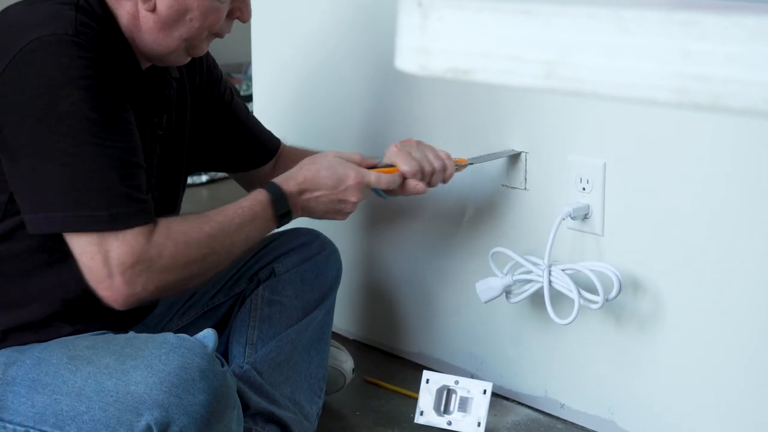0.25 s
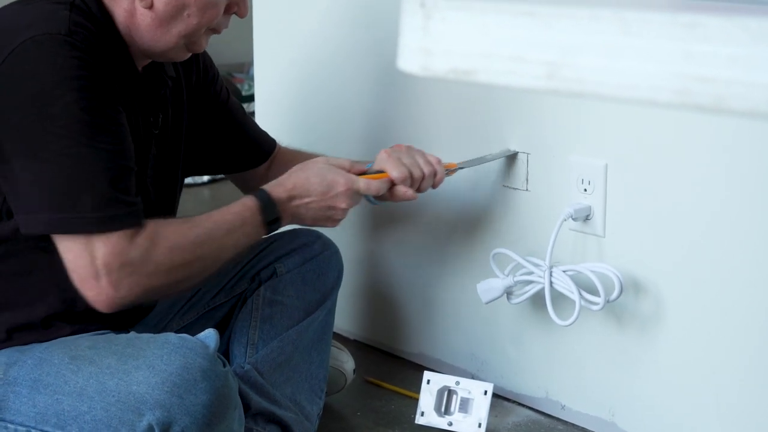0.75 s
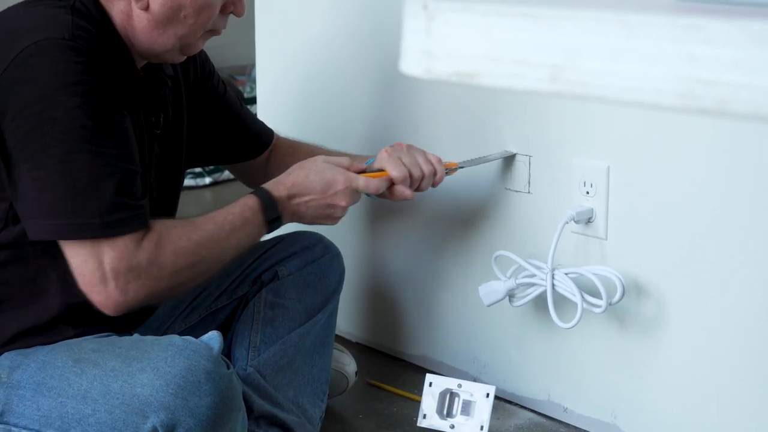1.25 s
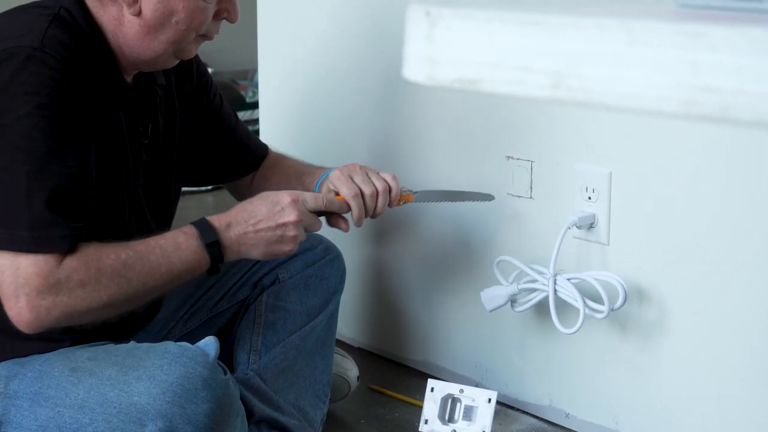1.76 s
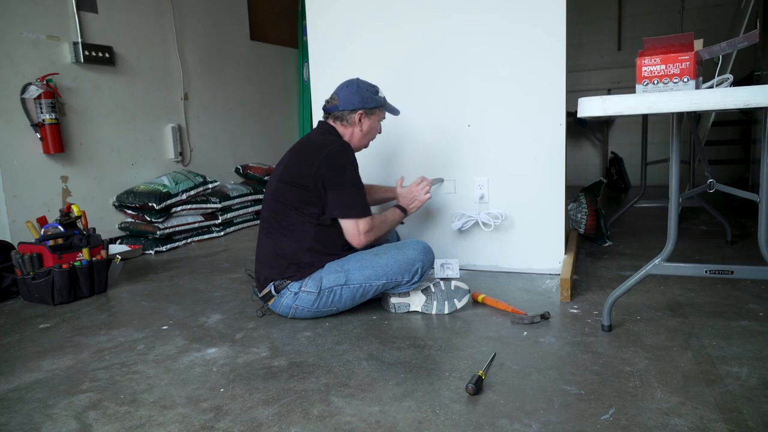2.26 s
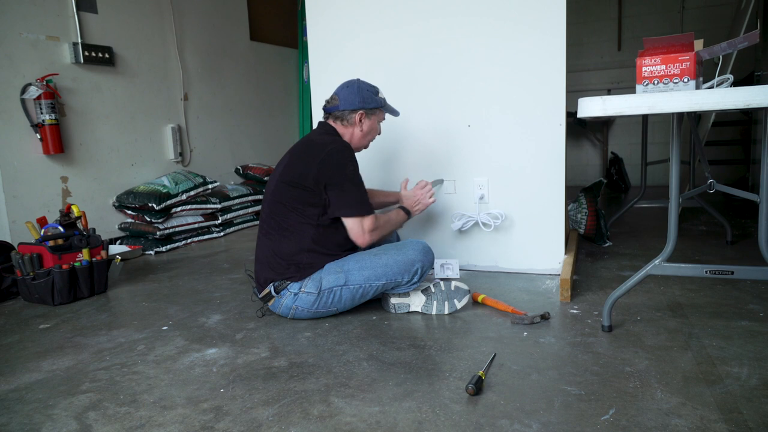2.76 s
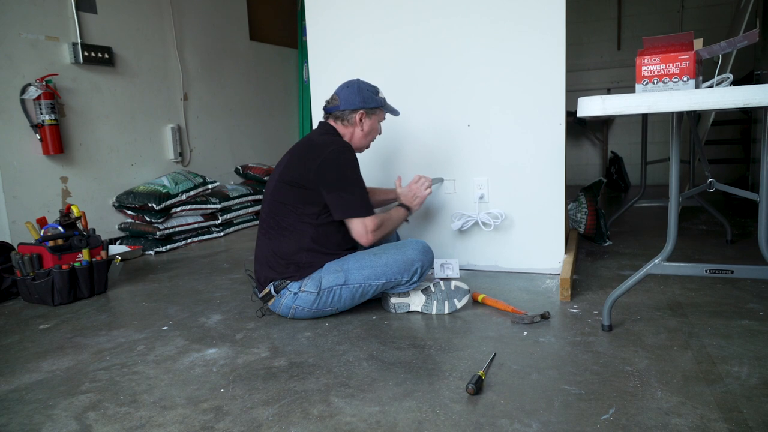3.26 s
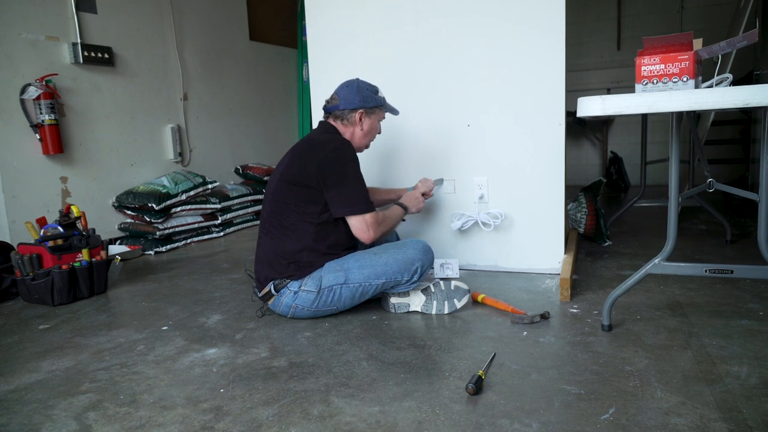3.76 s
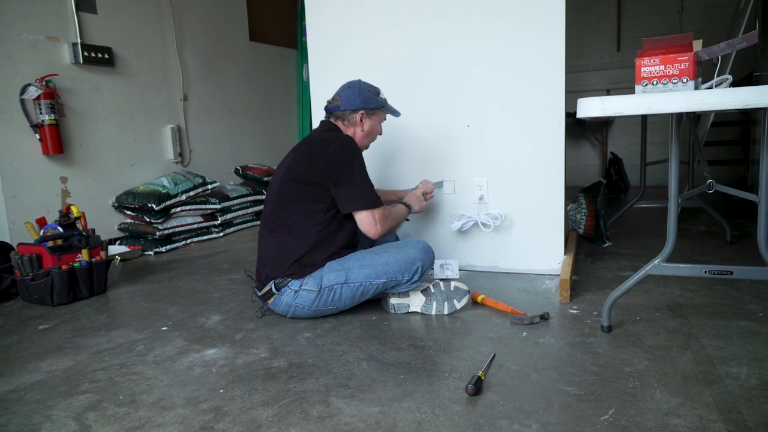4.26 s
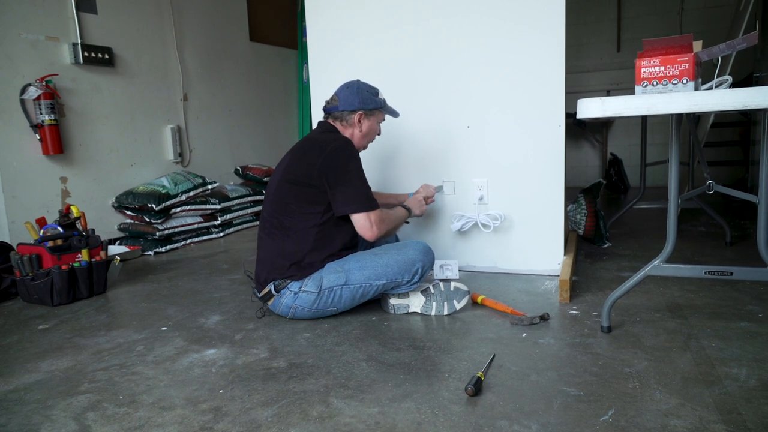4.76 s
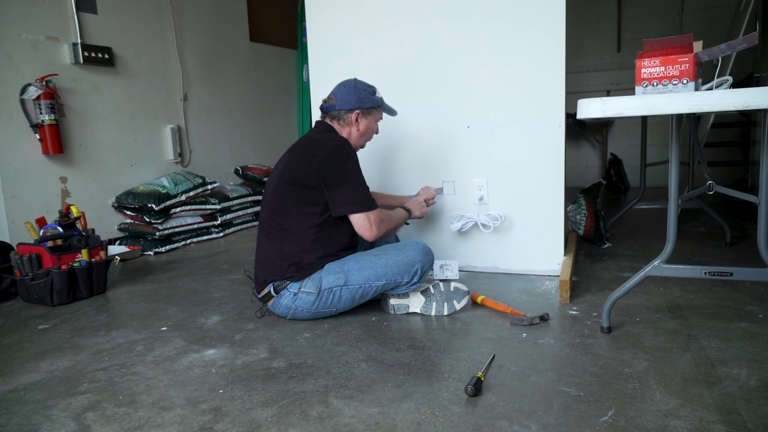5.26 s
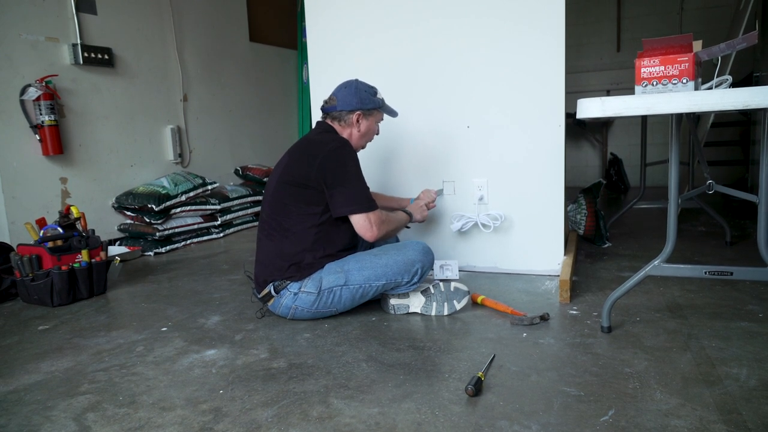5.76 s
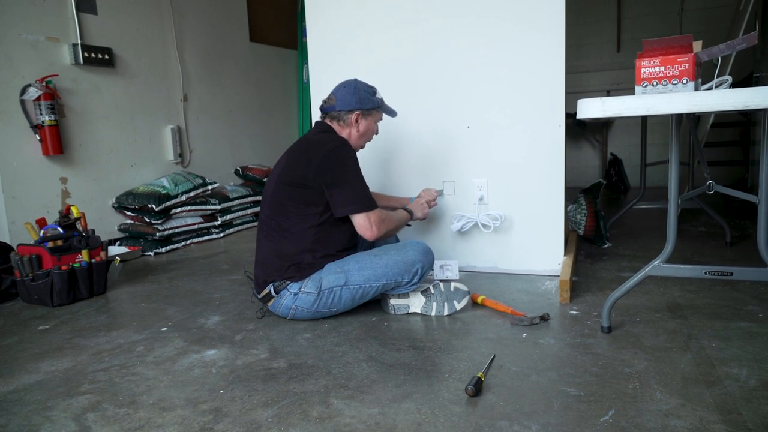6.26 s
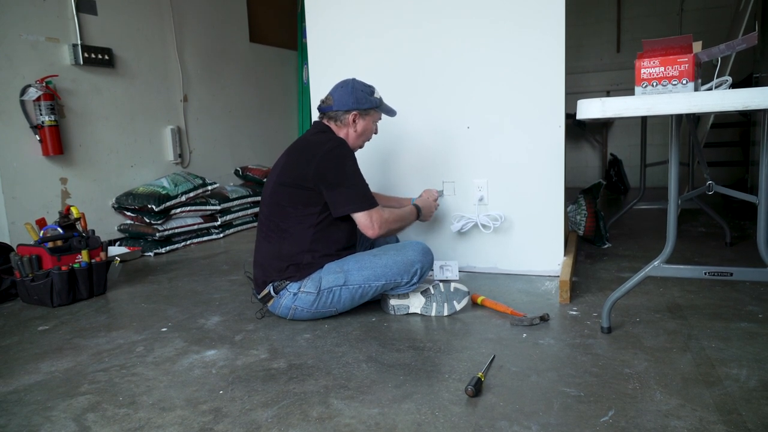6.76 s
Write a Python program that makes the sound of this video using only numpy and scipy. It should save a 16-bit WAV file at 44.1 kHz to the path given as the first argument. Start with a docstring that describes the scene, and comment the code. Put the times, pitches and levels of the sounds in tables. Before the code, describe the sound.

In a bare concrete garage, close to the wall, a short burst of rapid drywall sawing rasps and thuds. Then the blade is punched through by seven heavy, hollow blows, the second weaker, with crushing gypsum and little dry ticks between. A second run of back-and-forth sawing follows, fading into lighter, irregular strokes over a steady quiet rumble of room air.

```python
"""Short quick strokes rasp and thump: a jab saw cuts a plasterboard wall in a bare concrete garage.
Catching teeth excite the modes of hollow wall and board; gypsum grit rasps as noise through the blade's modes.
Between two cuts, palm blows on the handle punch the blade through with a boom and a crunch of gypsum.
Falling crumbs tick as short resonant noise bursts; a diffuse tail and a steady room tone surround it all."""
import sys
import numpy as np
from scipy import signal
from scipy.fft import rfft, irfft
from scipy.io import wavfile

SR = 44100
rng = np.random.default_rng(int(sys.argv[2]) if len(sys.argv) > 2 else 0)


def store_wav(level_fs):
    """Save 16-bit WAV to argv[1]."""
    pcm = np.round(np.clip(np.atleast_2d(level_fs), -1, 1) * 32767)
    wavfile.write(sys.argv[1], SR, pcm.T.astype(np.int16))


N = 308259   # samples

# Modal tables: f/Hz, bandwidth/Hz, then relative level/dB at each of the four working spots
# hollow wall between its studs
CAVITY_MODES = [(35.7, 18.7, -12.5, -12, -19, -7.5), (71.7, 23.9, 2.5, -2.5, -0.5, 1.5),
                (112.2, 33.5, 2, -1, 0, -1.5), (153.4, 29.8, 0, 2.5, -1, 1),
                (212, 47.9, -8.5, -5.5, -8, -7.5)]
# bending of the board
BOARD_MODES = [(275, 119, -4, -2.5, -3.5, -3), (353, 52, 4.5, 8, 6.5, 2.5), (415, 53.7, 2.5, 0, 2, 0.5),
               (493, 66, 0, -4.5, -1.5, -2), (574.4, 63.4, -4.5, -6, -3.5, -3),
               (670, 62, -5, -3.5, -5, -3.5), (764, 58, -11, -5, -10, -7),
               (885, 97, -12.5, -8.5, -12, -13.5), (1052, 94, -13.5, -9, -13, -15.5),
               (1129, 122, -19, -11.5, -13.5, -15), (1366, 456, -29.5, -18.5, -21.5, -22)]
# cut edge of the board
EDGE_MODES = [(1210, 196, 0, -6.5, -2, 1), (1685, 128, 3.5, 2, 5.5, -3), (1800, 440, -1.5, 0, 1.5, -2),
              (2310, 470, -4.5, 0, 1, -1), (2732, 88, 0.5, 4, 5.5, 2), (2870, 285, -7.5, -3, -6.5, -4.5)]
# steel blade
BLADE_MODES = [(3346, 390, -7.5, -2, -1.5, -5.5), (4040, 970, -11, -9, -7.5, -9.5),
               (4900, 930, -10.5, -10, -5.5, -10), (6050, 470, -15, -12, -13, -15),
               (6630, 230, -13.5, -30, -12, -15)]
# grit on the thin steel
GRIT_MODES = [(7900, 6100, -6, -4.5, -7.5, -4.5), (10040, 1200, 3, 4, 3, 2), (12900, 2700, 1.5, 2.5, 1, 3),
              (16800, 1200, 4, 4.5, 1, 0)]
# moves of the blade from first cut to punched hole, start of second cut and rest of it: t/s
MOVES_S = [1.8, 3.85, 4.98]


def sawing():
    """Stick-slip excitation: each tooth catches and lets go, driving modes and puffs of grit; hard thumps join in."""
    per_s, boom, knock, rasp, scrape, fine = stroke_curves()
    hard_boom, hard_knock, hard_scrape, hard_fine = hard_thumps()
    spot = np.searchsorted(MOVES_S, np.arange(N) / SR)

    wander = amp(2.1 * drift(per_s=70))   # teeth bind and slip unevenly
    passed = np.cumsum((per_s + 30) * wander / SR)
    catches = np.diff(np.floor(passed), prepend=0)
    teeth = rms_one(catches * amp(rng.uniform(-6.5, 4.0, N)))

    pulse = soften(teeth, hz=110) / (soften(teeth, hz=52.3) + 1e-4)   # evens out the tooth rate
    clumps = amp(2.1 * drift(per_s=70) + 2.0 * drift(per_s=45))   # gypsum breaks in clumps
    puffs = (0.42 + 0.23 * pulse) * clumps
    rumble = grains(1500, spread_db=2.5)
    grit = grains(7000, spread_db=3.0)

    wall_force = boom * (0.63 * teeth + 0.43 * rumble) + hard_boom
    board_force = knock * (0.54 * teeth + 0.7 * rumble) + hard_knock
    edge_force = (rasp * puffs + hard_scrape) * grit
    blade_force = (scrape * puffs + 0.72 * hard_scrape) * grit
    fine_force = (fine * puffs + hard_fine) * rng.standard_normal(N)

    out = resonate(wall_force, CAVITY_MODES, spot)
    out += resonate(board_force, BOARD_MODES, spot, shift_db=2.5)
    out += resonate(edge_force, EDGE_MODES, spot, shift_db=1.5)
    out += resonate(blade_force, BLADE_MODES, spot, shift_db=2.0)
    return out + resonate(fine_force, GRIT_MODES, spot, shift_db=2.0)


# nominal teeth in one stroke and their spread between strokes; cap on the rate before wander
TEETH_PER_STROKE, TEETH_SPREAD_DB, TEETH_CAP_PER_S = 9.5, 2, 190
RAMP_S, BITE_LAG = .012, 0.026   # margin at both ends; the bite peaks this share of a stroke after the speed
# the board's knock follows a weighted mean of bite and rasp: share of rasp, offset
KNOCK_FROM_RASP, KNOCK_DB = 0.38, -1
# the blade's scrape follows a weighted mean of rasp and fine grit: share of grit, offset
SCRAPE_FROM_GRIT, SCRAPE_DB = 0.52, -2.5
# saw strokes: start t/s, length/s, moment of top speed (share of stroke),
# relative levels of bite/dB, rasp/dB, fine grit/dB
STROKES = [(0.017, 0.11, 0.6, -27, -49, -61), (0.148, 0.074, 0.67, -16.5, -42.5, -49.5),
           (0.221, 0.04, 0.27, -24, -44, -51), (0.317, 0.099, 0.36, -24.5, -49, -58),
           (0.424, 0.048, 0.43, -34.5, -62, -64.5), (0.481, 0.024, 0.55, -30, -57, -62),
           (0.542, 0.15, 0.49, -33, -56.5, -63), (0.696, 0.093, 0.41, -21, -41.5, -46.5),
           (0.815, 0.12, 0.58, -26.5, -50, -55), (0.958, 0.12, 0.52, -27.5, -48, -56),
           (1.098, 0.094, 0.53, -29.5, -52.5, -57.5), (1.233, 0.092, 0.46, -23.5, -45.5, -53),
           (1.327, 0.11, 0.63, -31, -57.5, -58), (1.451, 0.093, 0.42, -28, -49, -51.5),
           (1.567, 0.067, 0.44, -35, -84, -60.5), (3.898, 0.087, 0.48, -37, -52.5, -57),
           (4.054, 0.12, 0.62, -26, -43, -50.5), (4.17, 0.058, 0.5, -33, -50, -62),
           (4.24, 0.074, 0.33, -32.5, -50, -55.5), (4.329, 0.1, 0.55, -22.5, -46.5, -52),
           (4.47, 0.099, 0.5, -19.5, -42, -52.5), (4.616, 0.082, 0.56, -24, -54.5, -54),
           (4.747, 0.1, 0.48, -27, -49, -53.5), (4.868, 0.096, 0.5, -31, -54, -56),
           (5, 0.11, 0.65, -26, -48, -51), (5.154, 0.1, 0.41, -31, -55.5, -54.5),
           (5.277, 0.065, 0.51, -33.5, -62, -62), (5.384, 0.11, 0.53, -34, -58, -60),
           (5.512, 0.069, 0.61, -31.5, -53, -57), (5.586, 0.02, 0.41, -34, -64, -63),
           (5.643, 0.072, 0.53, -37, -59.5, -62), (5.755, 0.097, 0.55, -34, -55.5, -57.5),
           (5.876, 0.079, 0.59, -37, -59.5, -58.5), (5.979, 0.08, 0.48, -33.5, -53, -55.5),
           (6.098, 0.074, 0.54, -47, -60.5, -63), (6.193, 0.052, 0.6, -37.5, -56, -59),
           (6.315, 0.07, 0.58, -45, -59, -60.5), (6.412, 0.047, 0.7, -36, -56.5, -56),
           (6.645, 0.16, 0.44, -58.5, -69.5, -71), (6.827, 0.059, 0.8, -44.5, -67, -64),
           (6.899, 0.074, 0.54, -39, -58, -57)]


def stroke_curves():
    """Force and speed control: wall and board follow the bite, while tooth rate and rasping follow the speed."""
    curves = np.zeros((6, N))
    chances = rng.standard_normal(len(STROKES))
    for (s, length, top, bite_db, rasp_db, grit_db), chance in zip(STROKES, chances):
        first = max(round((s - RAMP_S) * SR), 0)
        last = min(round((s + length + RAMP_S) * SR), N)
        at = np.arange(first, last)
        speed, bite = swell(at, top), swell(at, top + BITE_LAG)
        per_s = min(TEETH_PER_STROKE / length * amp(TEETH_SPREAD_DB * chance), TEETH_CAP_PER_S)
        knock_db = between(bite_db, rasp_db, KNOCK_FROM_RASP, KNOCK_DB)
        scrape_db = between(rasp_db, grit_db, SCRAPE_FROM_GRIT, SCRAPE_DB)
        tops = np.r_[per_s, amp([bite_db, knock_db, rasp_db, scrape_db, grit_db])]
        shapes = [speed ** .3, bite ** 1.2, bite ** 0.81, speed ** 1.24, speed ** 1.28, speed ** 1.02]
        curves[:, at] = np.maximum(curves[:, at], tops[:, None] * shapes)
    return curves


SPRAY_RISE_S, SPRAY_S = 0.0034, 0.0039   # time constants of the gypsum spray
# share of the knock's swing that the spray follows; offsets of coarse and fine spray
SPRAY_FOLLOWS, SPRAY_DB, FINE_SPRAY_DB = 0.41, -40.5, -43
# hardest short thumps: saw teeth snagging and, at 1.96 and 2.269 s, rebounds of palm blows:
# t/s, relative level/dB of the thump in the wall, relative level/dB of the knock in the board
HARD_THUMPS = [(0.047, -25, -39), (0.063, -1.5, -13), (0.168, -1, -9), (0.201, -6, -6), (0.228, -4, -0.5),
               (0.236, 0, -10), (0.347, 0, -28), (0.489, -1.5, -14.5), (0.702, 4.5, -29), (0.994, -12, -13),
               (1.126, 0, -17), (1.24, 5.5, -21), (1.373, 0, -31), (1.96, 2.5, -20), (2.269, 1.5, -13),
               (4.102, 4.5, -24), (4.207, 3, -11), (4.248, 1, -13), (4.3, -1, -14), (4.348, 7.5, -25),
               (4.384, 1, -14), (4.477, 3.5, -7), (4.519, 1, -14), (4.557, -12, -18), (4.631, 7.5, -31),
               (4.683, -23, -10.5), (4.765, -3, -10), (4.807, 5.5, -11), (4.91, 2.5, -33),
               (5.026, 0.5, -25), (5.163, -0.5, -33), (5.29, -5, -30), (5.316, -8, -24), (5.44, -4, -16.5),
               (5.542, 0, -23), (5.59, -6, -17), (5.677, -15, -19), (5.776, -9, -22), (5.794, -1, -29),
               (5.914, -2.5, -20), (6.01, 0.3, -12), (6.21, -7, -29), (6.445, 2, -24), (6.862, -20, -19.5),
               (6.877, -2, -20), (6.913, -2, -15.5)]


def hard_thumps():
    """Impulsive excitation: each snag or rebound thumps wall and board once and sends out a short spray of gypsum."""
    s, thump_db, knock_db = np.transpose(HARD_THUMPS)
    chance_db = 3.1 * rng.standard_normal((len(s), 2)).T
    spray_db = SPRAY_FOLLOWS * knock_db + chance_db + [[SPRAY_DB], [FINE_SPRAY_DB]]
    hits = np.zeros((4, N))
    hits[:, np.round(s * SR).astype(int)] = amp([thump_db, knock_db, *spray_db])
    boom, knock, scrape, fine = hits
    after = np.arange(SR // 20) / SR
    spray = (1 - np.exp(-after / SPRAY_RISE_S)) * np.exp(-after / SPRAY_S)
    sprays = signal.fftconvolve([scrape, fine], [spray], axes=1)[:, :N]
    return boom, knock, *np.abs(sprays)


PUNCH_HZ = 477.5
# the shudder follows a weighted mean of boom and punch, 9 dB lower
SHUDDER_FROM_PUNCH, SHUDDER_DB = 0.32, -9
# the crack follows a weighted mean of boom and crumble, 20.5 dB lower
CRACK_FROM_CRUMBLE, CRACK_DB = 0.31, -20.5
# palm blows on the handle: t/s, relative levels of boom/dB, punch/dB, crumble/dB,
# time for the crushing to fall to about half/s
BLOWS = [(1.931, -15, -27, -57.5, 0.023), (2.252, -24.5, -39.5, -65, 0.073),
         (2.491, -13.5, -14.5, -57, 0.028), (2.755, -15, -17, -61, 0.038), (3.03, -12.5, -13.5, -57, 0.028),
         (3.33, -7.5, -13.5, -45, 0.032), (3.636, -11.5, -27, -46.5, 0.028)]


def blows():
    """Impact and fracture: a blunt punch sets wall and board ringing while the tip shudders and crushes gypsum."""
    out = np.zeros(N)
    after = np.arange(SR // 4) / SR
    shudder = grains(900, spread_db=2.5)
    jerks = amp(2.5 * drift(per_s=50))   # the tip breaks through in jerks
    breaking = grains(9000, spread_db=2.5) * amp(2.5 * drift(per_s=120))
    contact = np.exp(-((after - .0056) / .0014) ** 2)
    for s, boom_db, punch_db, crumble_db, length in BLOWS:
        shudder_db = between(boom_db, punch_db, SHUDDER_FROM_PUNCH, SHUDDER_DB)
        crack_db = between(boom_db, crumble_db, CRACK_FROM_CRUMBLE, CRACK_DB)
        start = round(s * SR)
        span = slice(start, start + len(after))
        crush = np.minimum(after / 0.0047, 1) / (1 + (after / length) ** 1.99) * jerks[span]
        shaking = crush * shudder[span]

        # single-sample impulses strike the wall at once and the board 200 samples later
        wall_force = amp(boom_db + 18) * (after == 0) + amp(boom_db - 8.5) * shaking
        board_force = amp(punch_db + 17.5) * (after == after[200]) + amp(shudder_db) * shaking
        crack_force = amp(crack_db) * (crush + 0.33 * contact) * breaking[span]
        crumble_force = amp(crumble_db) * crush * breaking[span]

        out[span] += amp(punch_db + 8.5) * contact * np.sin(2 * np.pi * PUNCH_HZ * after)
        out[span] += resonate(wall_force, CAVITY_MODES, spot=1)
        out[span] += resonate(board_force, BOARD_MODES, spot=1)
        out[span] += resonate(crack_force, EDGE_MODES + BLADE_MODES, spot=1)
        out[span] += resonate(crumble_force, GRIT_MODES, spot=1)
    return out


TICK_LOW_HZ, TICK_HIGH_HZ, TICK_TREBLE_DB = 4400, 5650, -15
# after each blow a few more crumbs fall, thinning out: mean wait, mean level, spread of level
CRUMBS_FALL_S, CRUMB_DB, CRUMB_SPREAD_DB = 0.043, -62.5, 5
# clearest crumbs and blade ticks: t/s, relative level/dB
TICKS = [(1.7895, -69), (1.8491, -65), (1.9265, -53), (1.935, -47), (2.2812, -41), (2.3054, -51),
         (2.4194, -54), (2.6005, -59), (2.658, -54), (2.871, -51.5), (2.923, -50), (3.0604, -44),
         (3.1978, -52.5), (3.3284, -59), (3.4955, -49.5), (3.6038, -66), (6.5574, -72)]


def ticks():
    """Small impacts: short bursts of noise ring around one pitch, with a bright edge from the grit modes."""
    out = np.zeros(N)
    after = np.arange(400) / SR
    wait = rng.exponential(1, (len(BLOWS), 4))
    size = rng.standard_normal((len(BLOWS), 4))
    crumb_s = np.array(BLOWS)[:, :1] + CRUMBS_FALL_S * wait
    crumb_db = CRUMB_DB + CRUMB_SPREAD_DB * size
    rows = np.r_[np.c_[crumb_s.ravel(), crumb_db.ravel()], TICKS]
    noises = rng.standard_normal((len(rows), len(after)))
    pitches = TICK_LOW_HZ + rng.random(len(rows)) * (TICK_HIGH_HZ - TICK_LOW_HZ)
    for (s, level_db), noise, hz in zip(rows, noises, pitches):
        at = round(s * SR)
        span = slice(at, at + len(after))
        burst = noise * np.exp(-after / 0.003) * np.minimum(after / 0.0011, 1)
        out[span] += amp(level_db) * resonate(burst, [(hz, 1500, 0)])
        out[span] += amp(level_db + TICK_TREBLE_DB) * resonate(burst, GRIT_MODES, spot=1)
    return out


# reverberation time of the garage: f/Hz, T60/s
GARAGE_T60 = [(60, 0.83), (160, 0.61), (420, 0.43), (1100, 0.47), (2900, 0.59), (7700, 0.42), (14000, 0.12)]
# strength of the diffuse tail: f/Hz, relative level/dB
GARAGE_WET = [(60, -6.5), (250, -6.5), (1000, -2), (4000, -2), (12000, -8.5)]


def garage(x):
    """Diffuse reverberation: half-octave bands of noise decay exponentially at their own T60, after a short gap."""
    after = np.arange(SR) / SR
    hz = np.arange(SR // 2 + 1)
    noise = rfft(rng.standard_normal(SR))
    tail = 0
    for centre in 30 * 2 ** np.arange(0, 9.5, .5):
        octaves = np.clip(np.log2(hz / centre + 1e-9), -.5, .5)
        band = irfft(noise * np.cos(np.pi * octaves) ** 2, SR)
        t60 = at_hz(GARAGE_T60, centre)
        decay = amp(at_hz(GARAGE_WET, centre) - 60 * after / t60)
        even_energy = np.sqrt(2 * np.log(1000) / t60 / SR)   # offsets the greater energy of long decays
        tail = tail + band * decay * even_energy
    onset = np.clip((after - .006) / 0.021, 0, 1)
    return signal.fftconvolve(x, tail * onset)[:N]


AIR_DB = -53.5   # rms level of the room tone
# spectrum of the room tone: f/Hz, relative spectral level/dB
AIR = [(25, -6.5), (64, 1), (200, -12.5), (400, -13.5), (1860, -35), (5000, -44.5), (9000, -49.5),
       (16000, -53)]


def air():
    """Stationary noise: white noise shaped by a fixed spectrum gives a steady room tone."""
    hz = np.arange(N // 2 + 1) * SR / N
    spectrum = rfft(rng.standard_normal(N)) * amp(at_hz(AIR, hz))
    return amp(AIR_DB) * rms_one(irfft(spectrum, N))


def resonate(x, modes, spot=0, shift_db=0):
    """Modal superposition: parallel resonances of alternating sign, scaled so that white noise keeps its rms.
    With shift_db the share of each mode drifts, as the blade slides."""
    click = np.eye(1, 4096)[0]
    filters, response = [], 0
    for k, (hz, width_hz, *level_db) in enumerate(modes):
        r = np.exp(-np.pi * width_hz / SR)
        b = (-1) ** k * (1 - r * r) * np.array([1, 0, -1])
        a = [1, -2 * r * np.cos(2 * np.pi * hz / SR), r * r]
        filters.append((b, a))
        response = response + amp(level_db)[:, None] * signal.lfilter(b, a, click)
    levels = amp([mode[2:] for mode in modes]) / np.sqrt(np.sum(response ** 2, axis=1))
    out = 0
    for (b, a), level in zip(filters, levels):
        share = amp(shift_db * drift(per_s=12)) if shift_db else 1
        out = out + signal.lfilter(b, a, level[spot] * share * x + 1e-18)
    return out


def grains(per_s, spread_db):
    """Granular excitation: random clicks of uneven size and sign; rms 1."""
    sizes = amp(spread_db * np.minimum(rng.exponential(1, N), 5)) * rng.choice([-1, 1], N)
    return rms_one(sizes * (rng.random(N) < per_s / SR))


def soften(x, hz):
    """Blunt contact: a double one-pole low-pass rounds off each impulse."""
    r = np.exp(-2 * np.pi * hz / SR)
    return signal.lfilter([(1 - r) ** 2], [1, -2 * r, r * r], x + 1e-18)


def swell(at, top):
    """Stroke kinematics: a half sine skewed to peak at the given share of the span (kept within 0.1-0.9)."""
    peak = at[0] + np.clip(top, .1, .9) * len(at)
    through = np.interp(at, [at[0], peak, at[-1]], [0, .5, 1])
    return np.abs(np.sin(np.pi * through))


def drift(per_s):
    """Slow random modulation: straight lines between normal knots of unit spread."""
    knots = rng.standard_normal(int(N / SR * per_s) + 2)
    return np.interp(np.arange(N) / SR * per_s, np.arange(len(knots)), knots)


def between(a_db, b_db, share, plus_db):
    """Level interpolation: a weighted mean of two levels in dB, plus an offset."""
    share = np.clip(share, 0, 1)
    return (1 - share) * a_db + share * b_db + plus_db


def at_hz(points, hz):
    """Spectral interpolation: read a table on a log-frequency axis."""
    table_hz, values = np.array(points).T
    return np.interp(np.log(hz + 1), np.log(table_hz), values)


def amp(db):
    """Decibel law: level in dB to amplitude gain."""
    return 10 ** (np.asarray(db) / 20)


def rms_one(x):
    """Power normalisation: scale to rms 1."""
    return x / np.sqrt(np.mean(x ** 2) + 1e-20)


def scene():
    """Superposition: direct sound of saw and wall, its diffuse tail and the room tone add up."""
    wall = sawing() + blows() + ticks()
    return (wall + garage(wall) + air())[None]


CUTOFF_HZ = 15800


def record(dry):
    """Band limitation: a steep elliptic low-pass removes the highest treble."""
    low_pass = signal.ellip(12, .5, 60, CUTOFF_HZ, fs=SR, output="sos")
    return signal.sosfilt(low_pass, dry)


dry = scene()
out = record(dry)
store_wav(out)
```